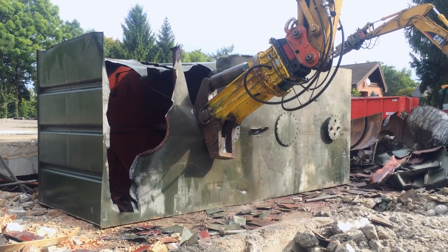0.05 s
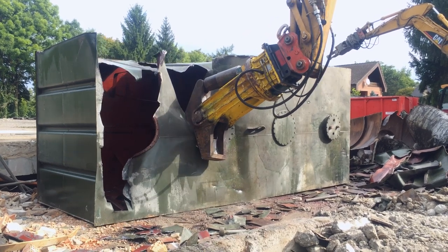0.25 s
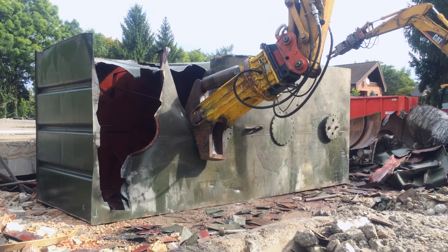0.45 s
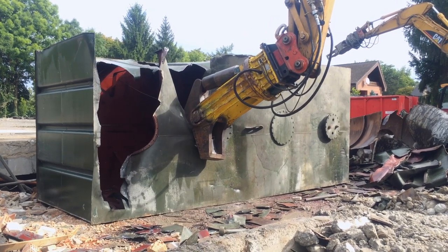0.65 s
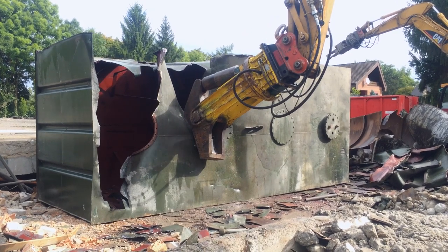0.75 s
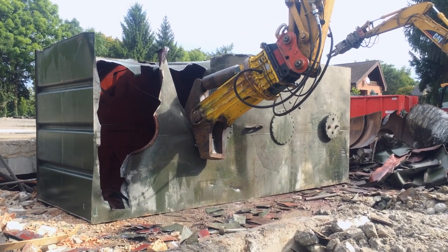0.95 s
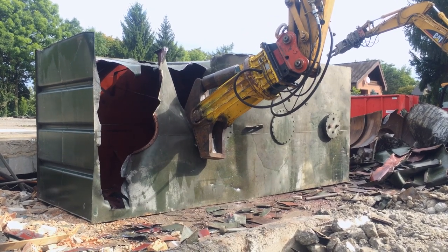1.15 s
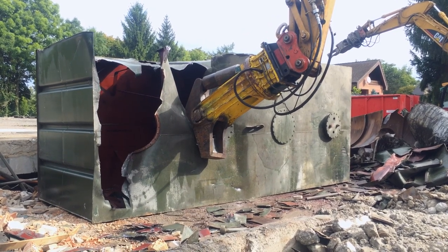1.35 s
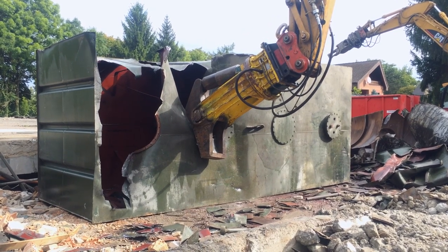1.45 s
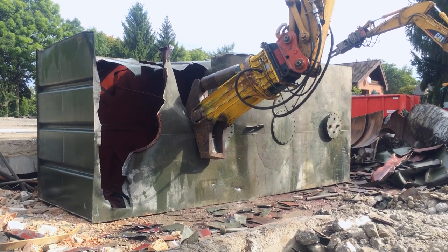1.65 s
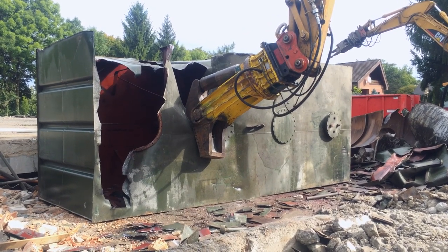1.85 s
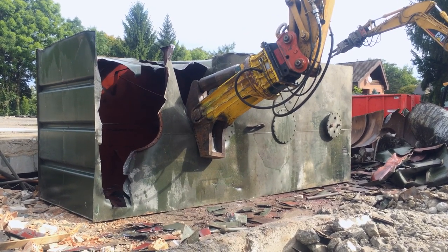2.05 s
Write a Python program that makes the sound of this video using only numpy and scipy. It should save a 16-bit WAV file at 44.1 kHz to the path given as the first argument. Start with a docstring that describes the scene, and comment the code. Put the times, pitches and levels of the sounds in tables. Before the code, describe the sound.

Steel sheet grinds, buckles and briefly squeals as an excavator's shear drags through a big tank, just after a short hiss. The hollow ringing fades into faint scrapes and thuds, with the machine rumbling steadily in a scrap yard.

```python
"""Light scrapes and dull knocks sound over an excavator's steady hum at a scrap yard.
After a short hiss, its hydraulic shear drags through the wall of a big steel tank: the sheet
buckles with a low surge, and the jaw grinds in tiny slips and briefly squeals as they lock
to a mode of the wall. The hollow tank rings on under more scrapes and knocks."""
import sys
import numpy as np
from scipy import signal
from scipy.fft import rfft, irfft, next_fast_len
from scipy.io import wavfile
from scipy.ndimage import map_coordinates

SR = 44100
rng = np.random.default_rng(int(sys.argv[2]) if len(sys.argv) > 2 else 0)


def generate_wav(signal):
    """Clip the signal to [-1, 1] and save it as 16-bit WAV at the path in sys.argv[1]."""
    frames = np.transpose(np.atleast_2d(signal))
    scaled = np.clip(frames, -1, 1) * 32767
    pcm = np.round(scaled).astype(np.int16)
    wavfile.write(sys.argv[1], SR, pcm)


N = 92610

# Grinding envelope, also drives the tank modes: time_s, level_db
GRIND_ENVELOPE = [(.18, -68.5), (.215, -48.5), (.248, -49), (.272, -42.5), (.37, -42), (.39, -39),
                  (.47, -39), (.545, -42.5), (.59, -49.5), (.68, -63.5), (.9, -75.5)]


def amp(db):
    """Decibels to gain."""
    return 10 ** (np.asarray(db) / 20)


def unit(x):
    """Scale to rms 1."""
    return x / np.sqrt(np.mean(x ** 2) + 1e-20)


def time_s():
    """Time of each sample."""
    return np.arange(N) / SR


def along(points, hz):
    """Interpolate (freq_hz, value) points on a log axis."""
    freq_hz, values = np.transpose(points)
    return np.interp(np.log(hz + 1), np.log(freq_hz + 1), values)


def curves(rows):
    """Per-sample curve for each column after the time."""
    knots_s, *columns = np.transpose(rows)
    return [np.interp(time_s(), knots_s, column) for column in columns]


def wobble(knots_per_s):
    """Smooth random curve."""
    return map_coordinates(rng.standard_normal(N // 20), [time_s() * knots_per_s], mode="wrap")


def filtered(x, response):
    """Apply a gain given as a function of frequency."""
    size = next_fast_len(N + SR // 2)
    return irfft(rfft(x, size) * response(np.fft.rfftfreq(size, 1 / SR)), size)[:N]


def coloured(x, spectrum, tilt_db_per_oct=0):
    """Shape x by (freq_hz, gain_db) points and a tilt; rms 1."""
    def response(hz):
        octaves = np.log2(np.maximum(hz, spectrum[0][0]))
        return amp(along(spectrum, hz) + tilt_db_per_oct * octaves)
    return unit(filtered(x, response))


def stroke(start_s, rise_s, hold_s, t60_s):
    """Linear rise, hold, exponential release."""
    age_s = time_s() - start_s
    release = amp(-60 * np.maximum(age_s - rise_s - hold_s, 0) / t60_s)
    return np.clip(age_s / rise_s, 0, 1) * release


def tone(hz, roughness, flutter_hz):
    """Partial of rms near 1; roughness (0-1) is the share that flutters in level and phase."""
    carrier = np.exp(2j * np.pi * np.cumsum(hz + np.zeros(N)) / SR)
    flutter = 1 - roughness + roughness * (wobble(flutter_hz) + 1j * wobble(flutter_hz))
    return np.real(carrier * flutter) / np.sqrt((1 - roughness) ** 2 / 2 + roughness ** 2)


def slips(rate_per_s=4000, scatter_db=1.5):
    """Dense tiny slips of steel on steel, of scattered size."""
    onsets = rng.random(N) < rate_per_s / SR
    return onsets * amp(scatter_db * rng.standard_normal(N)) * rng.choice([-1, 1], N)


def with_tank_ring(x, ring_db):
    """Add the dense ring of the hollow tank, longest in the bass."""
    # Tank decay: freq_hz, t60_s
    decay = [(80, 3.3), (250, 1.2), (700, 1.72), (2000, 1.53), (5000, 0.87), (12000, 0.48)]
    hz, age_s, noise = signal.stft(rng.standard_normal(N), SR, nperseg=512)
    t60_s = along(decay, hz)[:, None]
    _, tail = signal.istft(noise * amp(-60 * age_s / t60_s) / np.sqrt(t60_s), SR, nperseg=512)
    return x + amp(ring_db) * signal.fftconvolve(x, tail / np.linalg.norm(tail))[:N]


def excavator(rumble_db=-61):
    """The running machine rumbles and hums steadily."""
    # Rumble spectrum: freq_hz, gain_db
    spectrum = [(25, -45), (45, -16.5), (65, -10), (110, -6), (150, -10), (200, -10.5), (300, -11.5),
                (480, -18.5), (700, -17.5), (900, -30.5), (1500, -26.5), (2800, -36), (6000, -46),
                (14000, -55.5)]
    # Hum partials: pitch_hz, level_db
    partials = [(108, -68.5), (180, -75.5), (216, -73.5)]
    rumble = amp(rumble_db + 1.8 * wobble(8.73)) * coloured(rng.standard_normal(N), spectrum)
    hum = sum(amp(db) * tone(hz, roughness=0.26, flutter_hz=14) for hz, db in partials)
    return rumble + hum


def hiss(level_db=-57.5):
    """Short bright hiss as the jaw starts to move."""
    # Hiss spectrum: freq_hz, gain_db
    spectrum = [(500, -3), (1000, 9.5), (1500, -14), (3200, 2.5), (4400, -2.5), (4800, 7), (5150, -5),
                (5500, 4), (6300, -6.5), (9000, -8), (10300, -14), (13000, -15), (15000, -27)]
    envelope = stroke(start_s=0.08, rise_s=0.04, hold_s=0.04, t60_s=0.24)
    return amp(level_db) * envelope * coloured(rng.standard_normal(N), spectrum)


def knocks(half_width_oct=0.63):
    """The wall flexes with dull thuds."""
    # Thuds: start_s, level_db, pitch_hz
    thuds = [(0.0, -48, 94), (0.081, -48, 297), (.108, -54, 100), (.208, -51.5, 90), (.325, -41.5, 247),
             (0.423, -39.5, 96), (0.786, -50, 100), (0.839, -52.5, 250), (2.075, -47.5, 155)]
    out = np.zeros(N)
    for start_s, level_db, pitch_hz in thuds:
        noise = rng.standard_normal(N)
        band = filtered(noise, lambda hz: 1 / (1 + (np.log2((hz + 1) / pitch_hz) / half_width_oct) ** 4))
        out += amp(level_db) * stroke(start_s, rise_s=0.0036, hold_s=0, t60_s=0.21) * unit(band)
    return out


def scrapes():
    """The jaw shifts lightly against the torn edge."""
    # Jaw shifts: start_s, rise_s, hold_s, t60_s, level_db, tilt_db_per_oct
    shifts = [(0.0, 0.0021, 0.015, .5, -64.5, 0.8), (0.719, .035, 0.055, 0.27, -59.5, 1.5),
              (1.497, .015, 0.043, 0.33, -69, 3), (1.636, 0.029, 0.049, 0.14, -60, 0.5),
              (1.735, 0.028, 0.051, 0.4, -69.5, 1.5), (1.842, 0.087, 0.043, 0.89, -65, 1.5),
              (2.058, .02, 0.072, 0.47, -63, 3)]
    # Scrape spectrum: freq_hz, gain_db
    spectrum = [(150, -18.5), (480, -7), (680, 11.5), (950, -1), (1400, 3.5), (2100, -0.5), (2700, -8.5),
                (4200, -11), (7000, -23), (10000, -31), (15000, -64)]
    out = np.zeros(N)
    for *timing_s, level_db, tilt_db_per_oct in shifts:
        out += amp(level_db) * stroke(*timing_s) * coloured(slips(), spectrum, tilt_db_per_oct)
    return with_tank_ring(out, ring_db=2.5)


def tank_modes(gain_db=-10.5):
    """Each mode stores grinding energy and releases it at its own rate."""
    # Clearest tank modes: pitch_hz, relative_db, t60_s
    modes = [(105, 0.5, 0.86), (182, -6, 3.4), (213.4, -10.5, 0.67), (300.8, -16, 0.91), (344, -14, 1.5),
             (607, 4, 0.37), (741, -5.5, 3.05), (1080, -11, 1.3), (1300, -9.5, 0.37), (1457, -11.5, 0.75),
             (1536, -18.5, 0.52), (1574, -20, 0.4)]
    grind_db, = curves(GRIND_ENVELOPE)
    power = amp(grind_db) ** 2
    out = np.zeros(N)
    for pitch_hz, relative_db, t60_s in modes:
        retention = amp(-60 / (t60_s * SR)) ** 2
        energy = signal.lfilter([1 - retention], [1, -retention], power)
        partial = tone(pitch_hz, roughness=0.55, flutter_hz=16.1)
        out += amp(relative_db + gain_db) * np.sqrt(energy) * partial
    return out


def buckling():
    """The wall crumples in a low, noisy surge."""
    # Surge envelope: time_s, level_db
    envelope = [(.185, -54.5), (.215, -44.5), (.29, -40), (.345, -37.5), (.38, -45), (.45, -44), (.53, -46),
                (.62, -53.5), (.8, -53), (1.05, -57.5), (1.4, -73)]
    # Surge spectrum: freq_hz, gain_db
    spectrum = [(25, -22), (45, -36.5), (62, -10.5), (100, 1), (150, -2), (200, -2), (330, -4.5),
                (480, -12), (640, -6), (900, -37.5), (2500, -49)]
    level_db, = curves(envelope)
    surge = amp(level_db) * coloured(rng.standard_normal(N), spectrum)
    return with_tank_ring(surge, ring_db=-4.5)


def grinding(dull_cutoff_hz=3460, dull_below_db=-54.5, bright_range_db=11):
    """The jaw tears along the sheet in a stream of slips, brighter the harder it presses."""
    # Grinding spectrum: freq_hz, gain_db
    spectrum = [(200, 1), (480, -8.5), (600, 6.5), (760, 2), (950, -7.5), (1400, -1), (2200, -3.5),
                (2600, -9), (4000, -12.5), (7000, -25.5), (10000, -32.5), (15000, -60)]
    level_db, = curves(GRIND_ENVELOPE)
    bright = coloured(slips(), spectrum)
    dull = filtered(bright, lambda hz: 1 / np.sqrt(1 + (hz / dull_cutoff_hz) ** 2))
    bite = np.clip((level_db - dull_below_db) / bright_range_db, 0, 1)
    tearing = amp(level_db + 0.35 * wobble(46.7)) * (dull + bite * (bright - dull))
    return with_tank_ring(tearing, ring_db=-6.5)


def squeal(loose_db=-43, firm_db=-32, overtone_knee_db=-37.5, growth_db_per_db=2.1):
    """Stick-slip locks to one wall mode: a note with rough overtones, wavering as the grip loosens."""
    # Stick-slip note: time_s, pitch_hz, level_db
    note = [(.29, 712, -62), (.345, 721, -38), (.365, 724, -45), (.394, 730, -30), (.437, 728, -28),
            (.49, 729, -35), (.56, 731, -42.5), (.64, 733, -46), (.7, 734, -53), (.82, 731, -53.5),
            (.87, 735, -80)]
    # Harmonics 2 and 3: relative_db, roughness
    overtones = [(-6, 0.6), (-8, 0.37)]
    pitch_hz, level_db = curves(note)
    waver = np.interp(level_db, [loose_db, firm_db], [0.4, 0.05])
    out = amp(level_db) * tone(pitch_hz, roughness=waver, flutter_hz=44.9)
    overtone_db = overtone_knee_db + growth_db_per_db * np.minimum(level_db - overtone_knee_db, 0)
    for harmonic, (relative_db, roughness) in enumerate(overtones, 2):
        out += amp(overtone_db + relative_db) * tone(harmonic * pitch_hz, roughness, flutter_hz=69.6)
    sounding = (time_s() > note[0][0]) & (time_s() < note[-1][0])
    return with_tank_ring(out * sounding, ring_db=-23.5)


def scene():
    """All sources, summed to mono."""
    cut = grinding() + tank_modes() + buckling() + squeal()
    return (cut + scrapes() + knocks() + hiss() + excavator())[None]


def record(dry):
    """The microphone sheds the deepest bass and everything above its band limit."""
    low_cut_hz, band_limit_hz = 45, 15150
    highpass = signal.butter(2, low_cut_hz, "highpass", fs=SR, output="sos")
    return np.array([filtered(signal.sosfilt(highpass, x), lambda hz: hz < band_limit_hz) for x in dry])


dry = scene()
out = record(dry)
generate_wav(out)
```